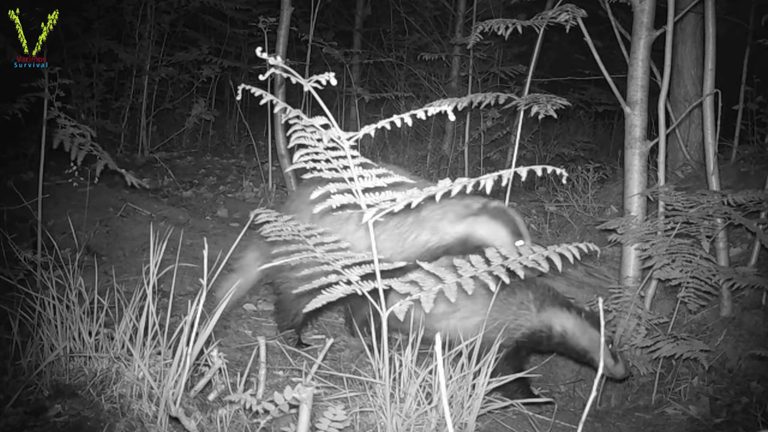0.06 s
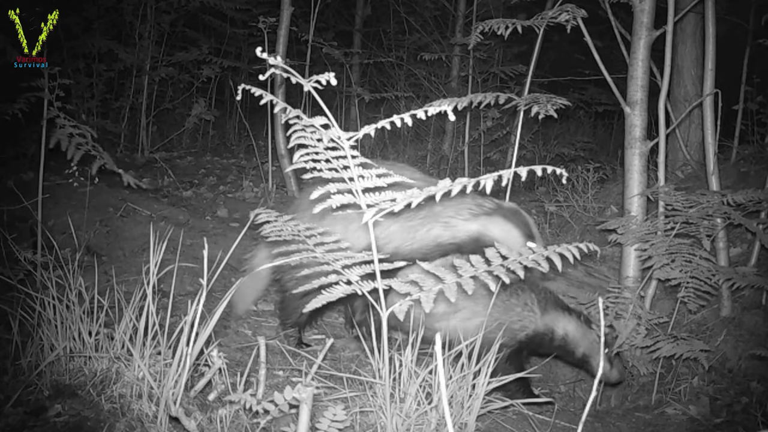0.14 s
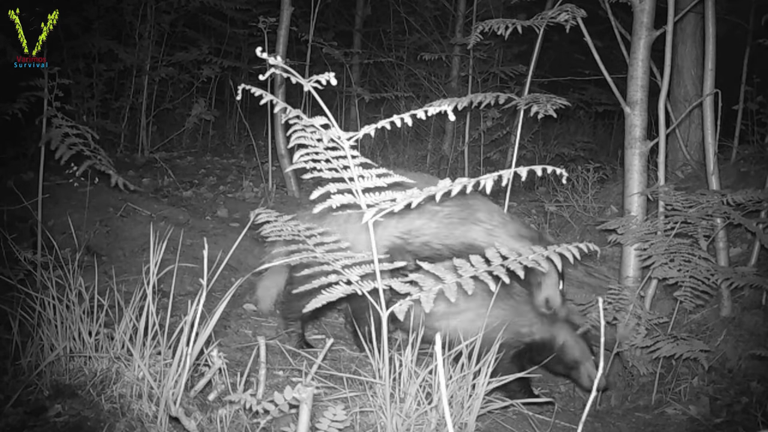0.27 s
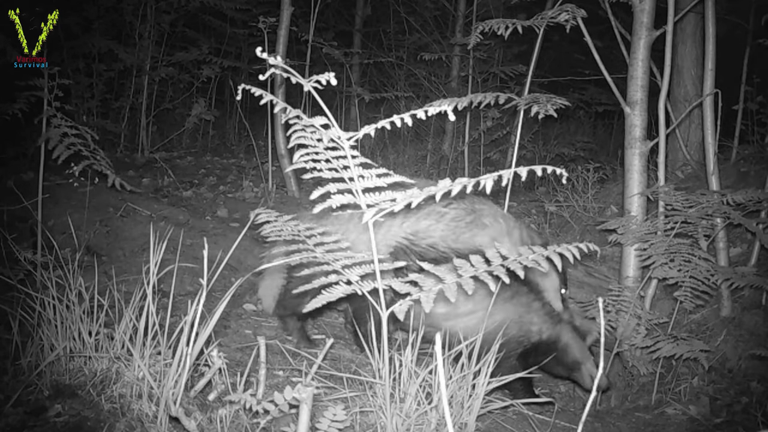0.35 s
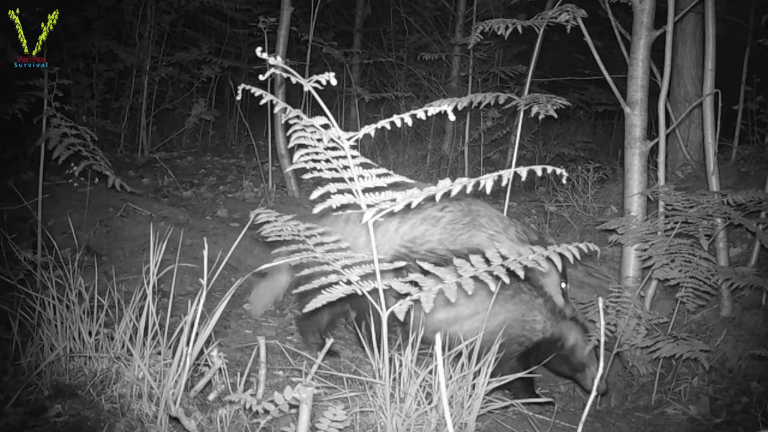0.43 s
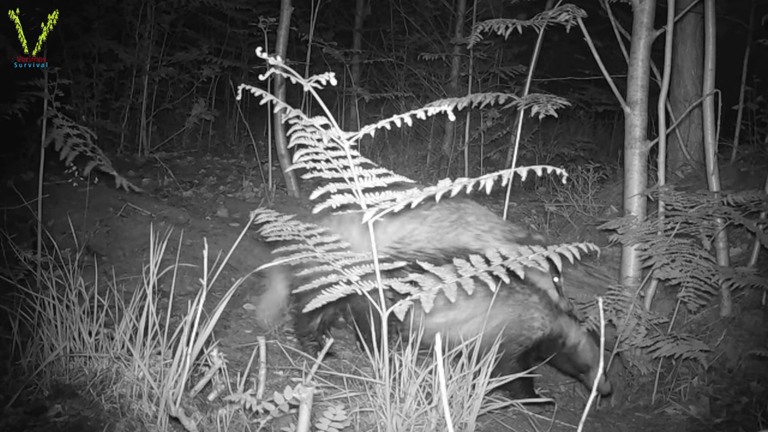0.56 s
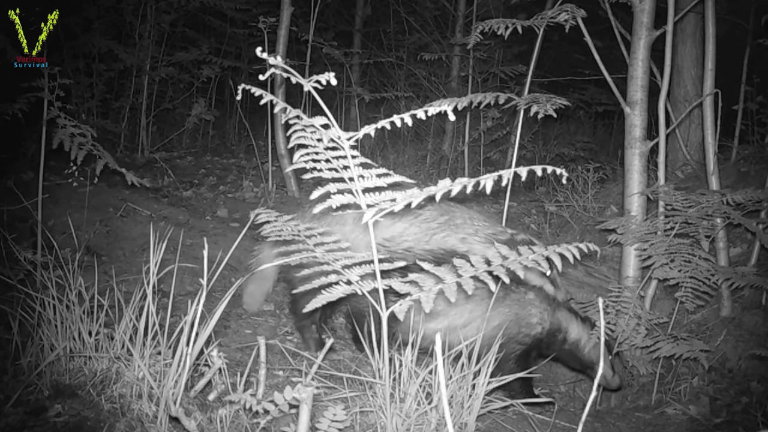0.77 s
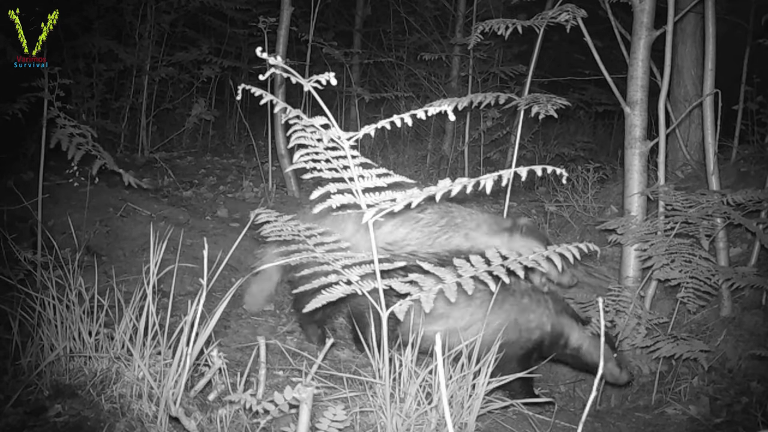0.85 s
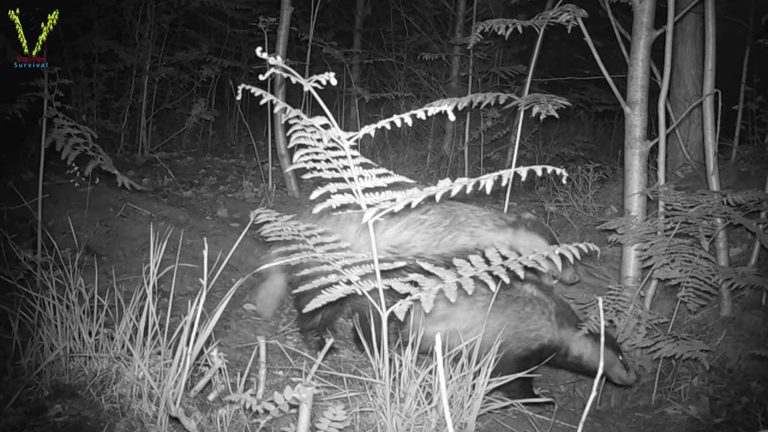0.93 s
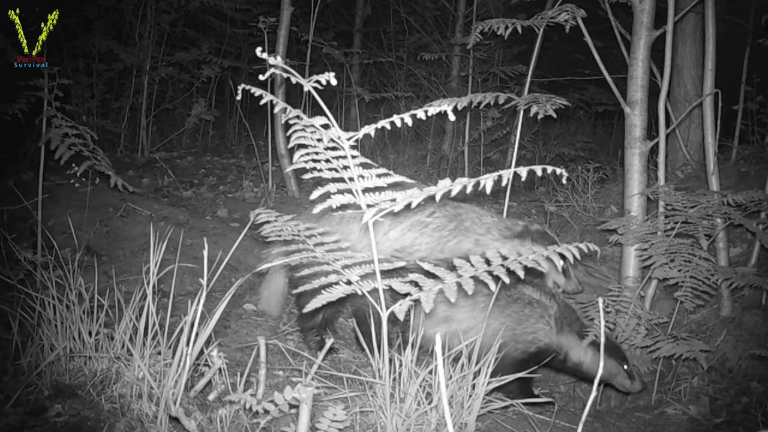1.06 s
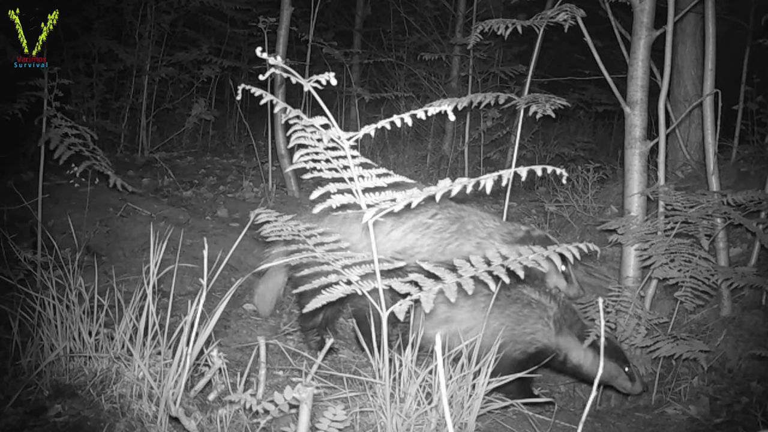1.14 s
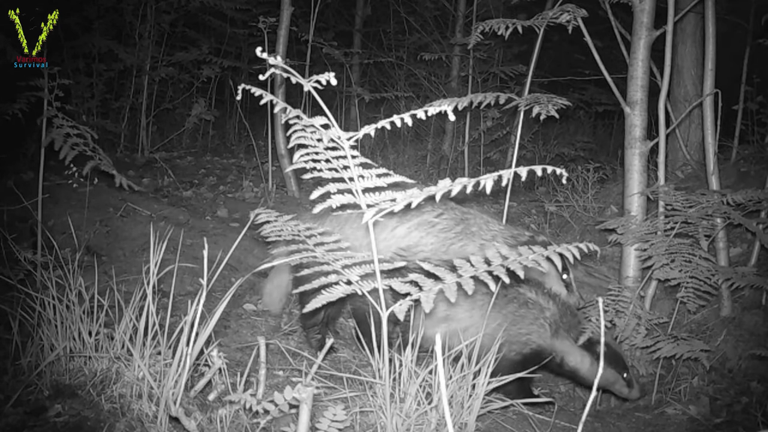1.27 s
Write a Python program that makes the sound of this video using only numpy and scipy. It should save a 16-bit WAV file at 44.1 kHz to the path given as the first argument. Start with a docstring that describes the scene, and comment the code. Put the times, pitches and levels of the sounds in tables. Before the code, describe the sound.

A badger gives one sharp, loud yap after short soft purrs and wet mouth clicks. A distant songbird then warbles twice over a faint forest hush, heard through a narrow-sounding trail camera close to the badger.

```python
"""A badger purrs in short runs with small wet clicks, and a far songbird starts to whistle.
The badger gives one sharp yap from its throat, overloading a nearby trail camera.
Then the bird warbles a phrase twice among the trees, with one more soft purr in between.
A forest hush and a faint low rumble run throughout. The camera hears only a narrow band of pitches."""
import sys
import numpy as np
from scipy import signal
from scipy.fft import rfft, irfft
from scipy.io import wavfile

SR = 44100
rng = np.random.default_rng(int(sys.argv[2]) if len(sys.argv) > 2 else 0)


def unload_audio(sound):
    """Save the sound as a 16-bit wav file, at the path given as the first command line argument."""
    columns = np.transpose(np.atleast_2d(sound))
    # keep every value between -1 and 1, then stretch to whole-number steps
    steps = np.round(np.clip(columns, -1, 1) * 32767)
    wavfile.write(sys.argv[1], SR, steps.astype(np.int16))


N = 57330
TIME = np.arange(N) / SR

# how well the camera hears each pitch: pitch_hz, gain_db
CAMERA_RESPONSE = [(10, 6), (3450, -1), (3650, -14), (3900, -10), (4300, -25), (4550, -47), (4800, -62),
                   (8000, -93.5)]


def yap():
    """Vocal fold pulses and puffs of air ring the throat; a rasp tops the call and a huff ends it."""
    # the course of the yap: time_s, pitch_hz, level_db
    course = [(0.228, 530.5, -46), (0.238, 556.2, -20), (0.2431, 623.6, -17), (0.2442, 696.5, 1),
              (0.251, 630.4, 0), (0.2577, 631, 1.5), (0.2596, 751, -4), (0.2627, 702, -5), (0.269, 726, -4),
              (0.269, 565, -25), (0.285, 508, -38.5)]
    # where the throat rings: pitch_hz, half_width_hz, gain_db
    throat = [(737, 280, -7), (1178, 320, 1.5), (1517, 340, -3.5), (2197, 120, 0), (2810, 150, -17.5)]
    times, pitch_hz, level_db = np.transpose(course)
    sounding = (TIME > times[0]) & (TIME < times[-1])
    jitter, air_share, flutter_hz = .025, .14, 158.6
    rasp_s, huff_s, huff_fall_db_per_s = .258, .256, 332
    hz = np.interp(TIME, times, pitch_hz) * (1 + jitter * drift(.0015))
    cycles = np.cumsum(hz * (TIME > times[0])) / SR
    effort = np.where(TIME < .261, 1, .3)  # the voice clears as the effort drops
    folds = sum(np.cos(2 * np.pi * k * cycles) for k in range(1, 7))
    folds *= 1 + effort * .52 * np.cos(np.pi * cycles)  # every other pulse is weaker
    folds *= 1 + effort * .31 * np.cos(2 * np.pi * flutter_hz * (TIME - times[0]))  # loose throat tissue
    puffs = np.exp(-(cycles % 1) / .4) * colour(rng.standard_normal(N), CAMERA_RESPONSE)
    airflow = (1 - air_share) * folds / np.std(folds[sounding])
    airflow += effort * air_share * puffs / np.std(puffs[sounding])
    voice = sum(amp(db) * ring_twice(airflow, pitch, 2 * half_width) for pitch, half_width, db in throat)
    voice = signal.sosfilt(signal.butter(4, 538, "high", fs=SR, output="sos"), voice)
    voice = voice / np.std(voice[sounding]) * amp(np.interp(TIME, times, level_db, left=-120, right=-120))
    rasp = ring_twice(airflow, hz=2538, width_hz=750)
    rasp *= amp(-5.5) / np.std(rasp[sounding])
    rasp *= np.exp(-((TIME - rasp_s) / .004) ** 2)  # loudest when the mouth is widest
    huff = unit(ring_twice(rng.standard_normal(N), hz=3100, width_hz=270))
    huff *= (TIME > huff_s) * amp(-25.5 - huff_fall_db_per_s * abs(TIME - huff_s))
    return voice + rasp + huff


def purrs():
    """Slow, slightly uneven pulses thump the badger's chest in short runs."""
    # runs of purring: start_s, length_s, pulses_per_s, level_db
    runs = [(.001, 0.075, 78.7, -39.5), (.092, 0.071, 81, -36), (0.19, 0.052, 91, -30.5),
            (.258, 0.032, 80, -32), (.712, 0.069, 67, -44.5)]
    # where the chest rings: pitch_hz, width_hz, gain_db
    chest = [(184, 37, -2), (447, 66, -9.5), (970, 270, -23)]
    jitter, shimmer_db = .043, 1
    out = np.zeros(N)
    for start, length, rate_hz, level_db in runs:
        cycles = np.cumsum(rate_hz * (1 + jitter * drift(.0034)) * (TIME > start)) / SR
        pulses = np.diff(np.floor(cycles), prepend=0) * amp(shimmer_db * drift(.0096))
        body = sum(amp(db) * ring(pulses, hz, width) for hz, width, db in chest)
        out += amp(level_db) * body / np.std(body[TIME > start]) * window(start, length, fade_s=.026)
    return out


def mouth_clicks():
    """Each click is a brief, gritty ring of the mouth with a wet splash at its peak."""
    # wet clicks: peak_s, pitch_hz, fade_s, level_db
    clicks = [(.009, 1821, .003, -34), (0.0137, 1883, 0.0042, -36), (0.0144, 3050, 0.0015, -41),
              (.026, 3150, 0.002, -29.5), (0.0385, 3000, 0.0018, -31.5), (0.052, 3080, 0.00075, -27),
              (0.053, 1895, 0.003, -41), (0.0703, 1735, 0.0026, -29.5), (0.095, 1720, 0.00093, -30.5),
              (0.1092, 3240, .001, -26), (0.157, 2090, 0.00054, -31), (.186, 1755, 0.0031, -33),
              (0.191, 2000, .001, -29), (0.2, 2170, 0.0004, -22), (0.211, 1830, 0.00099, -26),
              (0.214, 2720, 0.00084, -25), (.224, 1900, .0026, -31), (.234, 1730, .003, -35),
              (0.738, 1950, 0.0019, -43), (0.742, 1750, 0.0018, -36.5), (0.757, 2430, 0.002, -41)]
    grit = .4 * drift(.0008)
    splash = .59 * unit(ring(rng.standard_normal(N), hz=2400, width_hz=2500))
    out = np.zeros(N)
    for peak_s, hz, fade_s, db in clicks:
        fade = np.exp(-abs((TIME - peak_s) / fade_s) ** 1.4)
        tone = np.cos(2 * np.pi * hz * (TIME - peak_s) + grit)
        out += amp(db) * fade * (tone + splash * fade)
    return out


def bird():
    """A pure whistle: four plain notes, then two climbing phrases with quick downward flicks."""
    # plain notes: start_s, length_s, first_hz, last_hz, level_db
    notes = [(0.094, .064, 3030, 2668, -41.5), (0.153, .06, 3585, 3490, -37),
             (0.206, .036, 3497, 3240, -34.5), (0.272, 0.028, 3046, 2892, -34.5)]
    # warbled phrases: start_s, level_db, opening_hz
    phrases = [(0.482, -33.5, 2990), (0.987, -33, 2959)]
    # how each phrase swells and fades: since_start_s, gain_db
    swell = [(0, -25.5), (0.017, -3.5), (0.028, -5.5), (.042, -6), (.058, 4.5), (.072, 4.5), (.095, -2.5),
             (.13, -6), (.16, -6.5), (.212, -10.5), (.226, -24.5), (0.244, -11), (.275, -27)]
    # quick dips in pitch: time_s, depth_hz
    flicks = [(0.587, 775.6), (.645, 877), (.698, 942), (0.754, 975), (1.02, 220), (1.087, 727),
              (1.148, 964), (1.193, 1000)]
    top_hz, sag_hz_per_s, waver_hz = 3554, 361, 8
    climb_at_s, climb_s, flick_s = .039, .01306, .012
    out = np.zeros(N)
    for start, length, first_hz, last_hz, db in notes:
        hz = np.interp(TIME, [start, start + length], [first_hz, last_hz])
        out += amp(db) * window(start, length, fade_s=.014) * sine(hz)
    dips_hz = sum(depth * np.exp(-abs((TIME - at) / flick_s) ** 1.658) for at, depth in flicks)
    for start, db, opening_hz in phrases:
        age = TIME - start
        climb = .5 + .5 * np.tanh((age - climb_at_s) / climb_s)
        hz = opening_hz + climb * (top_hz - sag_hz_per_s * age - opening_hz)
        swell_db = np.interp(age, *np.transpose(swell), left=-100, right=-100)
        out += amp(db + swell_db) * sine(hz - dips_hz + waver_hz * drift(.0029))
    return np.sqrt(2) * out


def tree_echoes(x, fade_s):
    """Trunks scatter the sound into many echoes, which die away by 60 dB in fade_s."""
    echoes_per_s, build_s = 2000, .0045
    echoes = rng.standard_normal(N) * (rng.random(N) < echoes_per_s / SR)
    echoes *= amp(-60 * TIME / fade_s) * np.minimum(TIME / build_s, 1)
    return signal.fftconvolve(x, echoes / np.linalg.norm(echoes))[:N]


def forest():
    """An even hush, a low stir and a rumble that swells and wavers."""
    # tone of the hush: pitch_hz, gain_db
    hush_tone = [(15, -31), (200, -20), (400, -18.5), (650, -18), (850, -11.5), (1000, -15.5), (1300, -18),
                 (1700, -23), (2300, -29), (3400, -23.5), (4000, -32.5)]
    # tone of the stir: pitch_hz, gain_db
    stir_tone = [(15, -0.5), (35, -1), (90, -5.5), (140, -4), (250, -8), (400, -15.5), (700, -29.5),
                 (2000, -71)]
    # loudness of the stir: time_s, level_db
    stir_levels = [(0, -42), (.4, -46), (.56, -45), (.75, -44.5), (.92, -46.5), (1.08, -48), (1.3, -52)]
    # swells of the rumble: time_s, gain_db
    rumble_swells = [(0.0, -44), (0.032, -40.5), (0.122, -36), (0.31, -50), (0.344, -45), (0.398, -43.5),
                     (0.43, -36.5), (0.488, -35), (0.872, -49.5), (0.904, -38), (1.028, -36),
                     (1.144, -53.5), (1.216, -36), (1.3, -39.5)]
    rumble_hz, wander = 61.5, .1
    hush = unit(colour(rng.standard_normal(N), hush_tone)) * amp(-41.5)
    stir = unit(colour(rng.standard_normal(N), stir_tone))
    stir *= amp(np.interp(TIME, *np.transpose(stir_levels)))
    rumble = unit(sine(rumble_hz * (1 + wander * drift(.026))))
    rumble *= amp(np.interp(TIME, *np.transpose(rumble_swells)) - 4.5)
    return hush + stir + rumble


def amp(db):
    """Turns decibels into a multiplier."""
    return 10 ** (np.asarray(db) / 20)


def unit(x):
    """Scales a sound to an average strength (rms) of 1."""
    return x / np.sqrt(np.mean(x ** 2) + 1e-20)


def sine(hz):
    """A pure tone that follows a changing pitch."""
    return np.sin(2 * np.pi * np.cumsum(hz) / SR)


def colour(x, points):
    """Shapes the tone along a curve of (pitch_hz, gain_db) points."""
    hz, db = np.transpose(points)
    f = np.fft.rfftfreq(2 * N, 1 / SR)
    return irfft(rfft(x, 2 * N) * amp(np.interp(np.log(f + 1), np.log(hz), db)))[:N]


def drift(seconds):
    """A smooth random wobble that changes over about the given time."""
    f = np.fft.rfftfreq(N, 1 / SR)
    return unit(irfft(rfft(rng.standard_normal(N)) * np.exp(-(2 * f * seconds) ** 2), N))


def ring(x, hz, width_hz):
    """Keeps the sound near one pitch, as a hollow space does."""
    return signal.lfilter(*signal.iirpeak(hz, hz / width_hz, SR), x)


def ring_twice(x, hz, width_hz):
    """Two rings in a row pick out the pitch more sharply."""
    return ring(ring(x, hz, width_hz), hz, width_hz)


def window(start, length, fade_s):
    """Fades in, then out, within the given length."""
    return np.sin(np.pi / 2 * np.clip(np.minimum(TIME - start, start + length - TIME) / fade_s, 0, 1))


def overload(x, ceiling, hardness):
    """Flattens peaks at the ceiling."""
    return x / (1 + abs(x / ceiling) ** hardness) ** (1 / hardness)


def scene():
    """The near badger has little echo; the far bird has a lot."""
    badger = yap() + purrs() + mouth_clicks()
    song = bird()
    near = badger + amp(-33) * tree_echoes(badger, fade_s=.71)
    far = song + amp(-1) * tree_echoes(song, fade_s=.6)
    return (near + far + forest())[None]


def record(dry):
    """The camera squashes loud peaks, keeps a narrow band of pitches and adds a faint hiss."""
    sampling_hz, hiss_db, top_hz = 8000, -93.5, 16100
    x = overload(dry[0], ceiling=amp(5), hardness=4.3)
    x = signal.oaconvolve(x, signal.firwin(255, sampling_hz / 2, fs=SR), "same")
    x *= 1 + 2 * np.cos(2 * np.pi * sampling_hz * TIME)  # slow sampling mirrors the top of the band
    x = colour(x, CAMERA_RESPONSE)
    x = overload(x, ceiling=1, hardness=21) + amp(hiss_db) * rng.standard_normal(N)
    return signal.oaconvolve(x, signal.firwin(255, top_hz, window=("kaiser", 8), fs=SR), "same")[None]


dry = scene()
out = record(dry)
unload_audio(out)
```